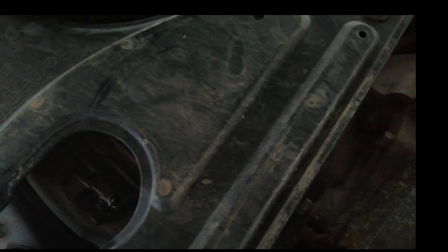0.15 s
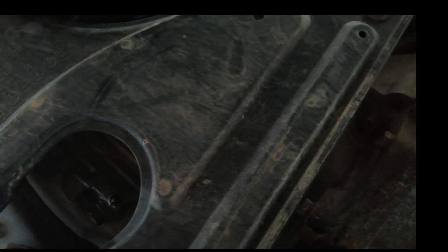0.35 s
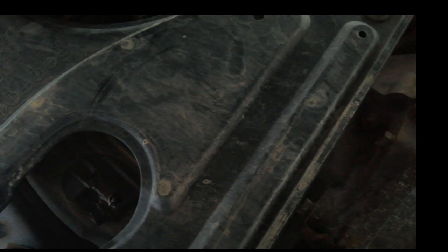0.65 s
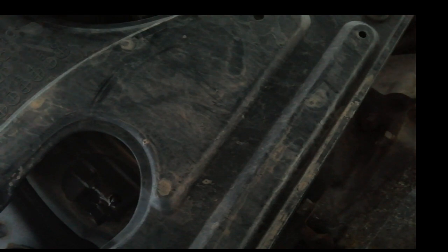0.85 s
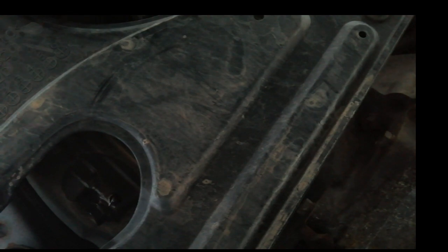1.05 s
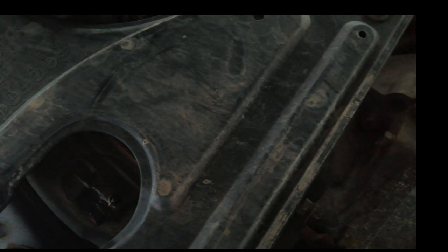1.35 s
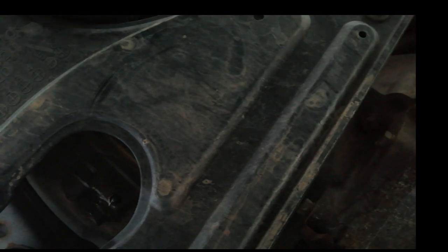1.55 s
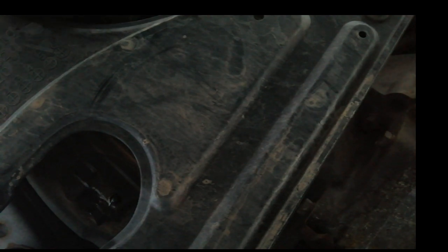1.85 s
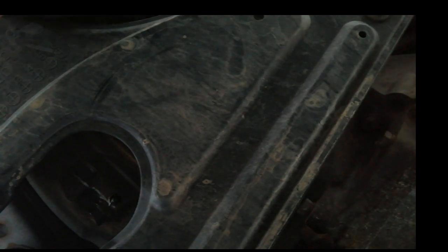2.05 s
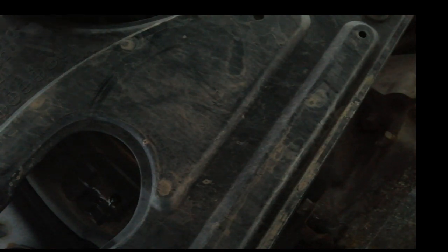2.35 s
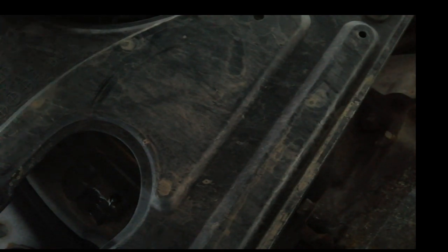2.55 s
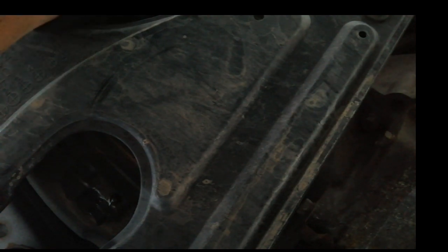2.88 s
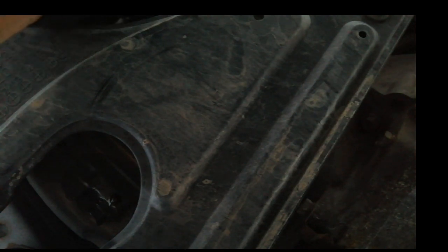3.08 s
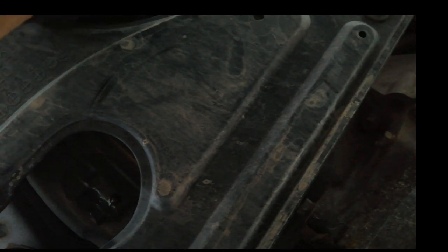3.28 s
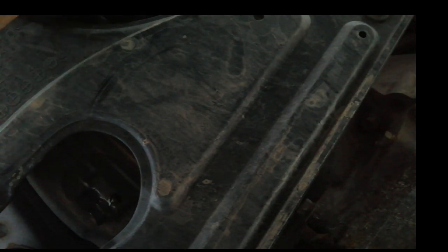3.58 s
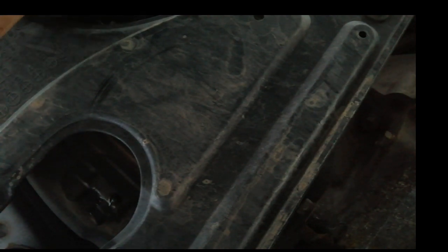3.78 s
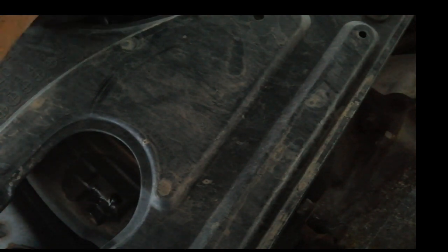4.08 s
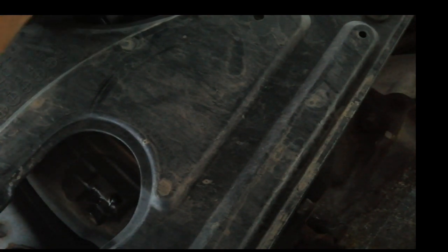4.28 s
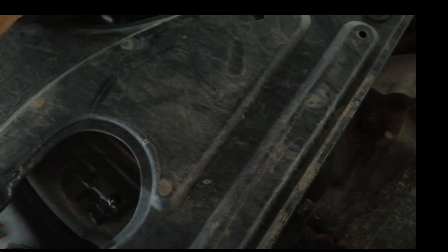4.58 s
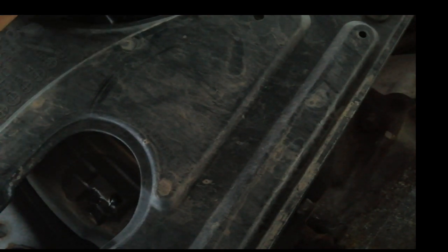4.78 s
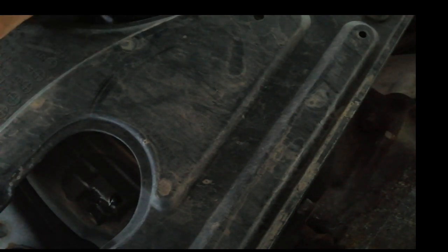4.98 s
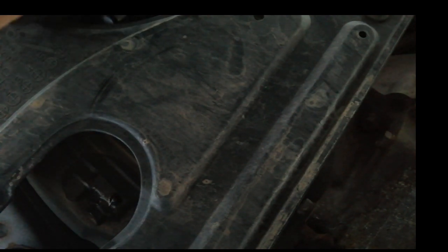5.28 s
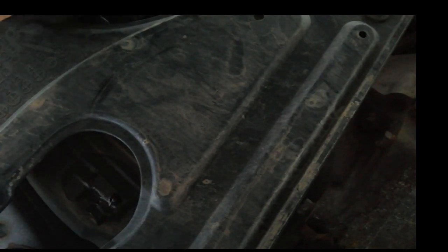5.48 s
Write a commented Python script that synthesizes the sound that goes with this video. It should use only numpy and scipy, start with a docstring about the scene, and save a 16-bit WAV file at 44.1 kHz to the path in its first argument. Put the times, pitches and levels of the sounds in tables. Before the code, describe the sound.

Oil drips unevenly into a catch pan under a vehicle, splatting and knocking over a faint high hiss.

```python
"""Engine oil drips unevenly into a catch pan under a vehicle. A high hiss, faint outdoor noise and a low
drone run from the start. Ragged splats hit the pan, joined by scuffs, hollow bumps, soft thumps and faint
high ticks. At 1.5 s one drop smacks the bare wall, and the hiss narrows and gains a thin whine. From 2 s
whole drops knock the pan and the underbody throws the knocks back; a limiter ducks briefly under the
loudest. From about 4 s a light, crinkly rustle ticks among the drips."""
import sys
import numpy as np
from scipy import signal
from scipy.fft import rfft, irfft, next_fast_len
from scipy.io import wavfile
from scipy.ndimage import uniform_filter1d, minimum_filter1d, map_coordinates

SR = 44100
rng = np.random.default_rng(int(sys.argv[2]) if len(sys.argv) > 2 else 0)


def wrap_up_sound(samples):
    """Save the sound to the file named by the first command line argument, as 16-bit audio."""
    columns = np.atleast_2d(samples).T
    # keep every value between -1 and 1, then stretch to whole-number steps
    tamed = np.clip(columns, -1, 1)
    steps = np.round(tamed * 32767).astype(np.int16)
    wavfile.write(sys.argv[1], SR, steps)


N = 248283
TIME = np.arange(N) / SR
AGE = np.arange(SR // 2) / SR  # seconds since a hit

# Stereo width of the noise beds. Each row: frequency in Hz, left-right correlation.
LIKENESS = [(60, 0.92), (130, 0.98), (290, 0.74), (640, 0), (1400, 0.37), (3000, 0.012)]
# EQ of the opening hiss. Each row: frequency in Hz, gain in dB.
BROAD_HISS_EQ = [(1470, -54), (2500, -48), (3220, -22), (3880, -22), (4630, -10.5), (5010, -8), (5370, -10),
                 (6020, -7), (6760, 0), (7360, -1.5), (9070, -0.5), (12300, -16.5), (13900, -17),
                 (15100, -28), (15800, -17.5)]
# EQ of the narrowed hiss. Each row: frequency in Hz, gain in dB.
NARROW_HISS_EQ = [(1470, -51.5), (2500, -21), (3300, -22), (4000, -15), (4710, -5), (5450, -6), (6920, -3),
                  (7590, 4.5), (7950, 3), (9280, 2), (10200, -9), (11500, -8.5), (13900, -17),
                  (15100, -21.5), (15800, -24.5)]
# EQ of the outdoor bed. Each row: frequency in Hz, gain in dB.
OUTDOOR_EQ = [(76, -26.5), (130, -3), (321, -9.5), (573, -13.5), (771, -11), (948, -11), (1050, -11.5),
              (1550, -11), (1740, -13), (4500, -14.5), (5850, -45), (9900, -120)]
# Fader ride of the outdoor bed. Each row: time in seconds, relative level in dB.
OUTDOOR_RIDE = [(0.0, -61.5), (0.44, -62), (1.35, -65.5), (2.32, -60.5), (2.56, -61.5), (3.12, -62.5),
                (3.23, -58.5), (4.47, -55.5), (5.24, -62.5), (5.63, -62.5)]
# Fader ride of the drone. Each row: time in seconds, relative level in dB.
DRONE_RIDE = [(0.0, -51), (0.53, -57.5), (0.92, -43.5), (1.29, -58), (1.74, -44.5), (1.93, -52.5),
              (5.3, -52.5), (5.63, -54)]
# EQ of the rumble. Each row: frequency in Hz, gain in dB.
RUMBLE_EQ = [(20, -19), (40, -14.5), (65, 0.5), (85, -5), (100, -5.5), (125, -18.5), (180, -27.5),
             (300, -41.5)]
# Modes of the oil-damped pan, the faint lingering ones last.
# Each row: frequency in Hz, relative level in dB, t60 in seconds, left minus right in dB.
PAN_MODES = [(382, -32, .09, 0), (710, -25, .06, 2), (825, -14, .07, -2), (955, -10, .06, -5),
             (992, -3.5, .08, -6), (1045, -9, .08, -1), (1138, -2, .11, 2), (1240, -10, .09, -1),
             (1305, -10, .1, -2), (1389, -11, .12, 0), (1505, -11, .08, 7), (1615, -11, .07, 5),
             (1847, -21, .1, 0), (2126, -28, .1, -2), (2528, -11, .07, -4), (2660, -16, .06, -2),
             (2750, -15, .075, -2), (2975, -19, .08, -3), (3172, -16, .08, -5), (3600, -29, .07, -4),
             (4850, -26, .06, -5), (5350, -31, .04, -5), (805, -36, .4, 0), (880, -34, .6, 0),
             (985, -27, .3, 0), (1168, -33, .5, 0), (1384, -36, .45, 0), (1513, -39, .9, 0)]
# EQ of the echoes under the vehicle. Each row: frequency in Hz, gain in dB.
ECHO_EQ = [(100, -42), (250, -27), (350, -24.5), (520, -22), (720, -11.5), (1050, -2.5), (1500, -4),
           (2050, -17), (2700, -11), (3900, -21), (5200, -21.5), (6800, -30.5), (15000, -49.5)]
# Decay of those echoes. Each row: frequency in Hz, t60 in seconds.
ECHO_DECAY = [(200, 0.42), (1100, 0.17), (3000, 0.16), (6000, 0.26), (12000, .06)]
# Ragged splats and a few faint rustling ticks (at 4.049, 4.085, 4.964 and 5.227 s). Each row: start in
# seconds, relative level in dB, tilt from dull to bright in dB, spread of the after-hits in seconds.
SPLATS_AND_TICKS = [(0.19, -33, -13, .02), (.689, -28, -2.5, .002), (1.663, -14.5, -0.5, .02),
                    (2.411, -18.5, 12, .005), (2.767, -17.5, 2.5, .0085), (3.243, -19.5, -1, .0063),
                    (3.368, -21, -12, .0063), (3.701, -18.5, -3, .016), (3.838, -18.5, -0.5, .0067),
                    (4.049, -39.5, 15.5, .0034), (4.085, -32.5, 18.5, .004), (4.161, -28, -6, .015),
                    (4.581, -20.5, 0.5, .021), (4.964, -38.5, -1, .024), (5.227, -28.5, -6, .024)]
# EQ of their dry slap. Each row: frequency in Hz, gain in dB.
SLAP_EQ = [(150, -30.5), (350, -8.5), (620, 1), (1200, 3), (2200, -8), (3300, -11.5), (6000, -30)]
# Dull scuffs. Each row: start in seconds, level in dB, rise in seconds.
SCUFFS = [(0.246, -46, 0.014), (0.282, -43, 0.027), (0.457, -39, 0.0015), (.494, -42.5, 0.0025),
          (0.859, -52, 0.021), (1.09, -60.5, 0.041), (2.43, -47.5, 0.018)]
# EQ of the scuffs. Each row: frequency in Hz, gain in dB.
SCUFF_EQ = [(71, -38), (120, -11), (198, 3.5), (316, -13.5), (571, -6), (658, -14.5), (1000, -4.5),
            (1120, -18.5), (1550, -14), (2150, -25.5), (2940, -18.5), (3440, -29), (5000, -29), (6500, -57),
            (11000, -120)]
# Hollow bumps. Each row: start in seconds, level in dB, pitch in Hz.
BUMPS = [(.458, -42, 184.6), (0.904, -47.5, 214), (3.698, -53, 269), (5.227, -51.5, 264)]
# Soft low thumps. Each row: crest in seconds, level in dB.
THUMPS = [(0.731, -27), (1.597, -32.5), (2.214, -29), (2.568, -30), (2.98, -33.5), (3.127, -37),
          (3.454, -33.5), (3.595, -31.5), (3.974, -30.5), (4.131, -35), (4.497, -32.5), (4.623, -35),
          (4.969, -34.5), (5.131, -34.5), (5.605, -35.5)]
# Faint high ticks and a light, crinkly rustle. Each row: start in seconds, level in dB, t60 in seconds.
RUSTLE = [(.789, -50, 0.051), (1.184, -47.5, .042), (3.36, -48.5, 0.11), (3.69, -55, .3),
          (4.062, -49.5, .15), (4.304, -46.5, 0.38), (4.394, -41.5, 0.25), (4.464, -42, 0.065),
          (4.571, -36.5, 0.17), (4.662, -53.5, 0.32), (4.793, -47.5, .16), (4.945, -48.5, 0.23),
          (5.229, -43, 0.15)]
# EQ of the crinkle. Each row: frequency in Hz, gain in dB.
CRINKLE_EQ = [(2000, -26), (3500, -9.5), (7000, -18), (9300, -7), (10600, 1.5), (12000, -11.5),
              (15500, -19)]
# EQ of the smack's crack. Each row: frequency in Hz, gain in dB.
CRACK_EQ = [(120, -56), (200, -30), (390, -11), (640, -30.5), (953, 1), (1120, -7), (1890, 1.5),
            (2480, -13), (3100, -7.5), (3410, -14.5), (5320, -36.5), (7090, -23), (9000, -42), (11700, -40),
            (19800, -120)]
# Thin tones in the hiss. Each row: frequency in Hz, relative level in dB.
WHINE_TONES = [(7779, -68.5), (8075, -72), (8732, -69)]
# Whole drops. Each row: start in seconds, relative level in dB, treble edge in dB.
DROPS = [(2.037, -34.5, -13), (2.108, 4.5, -9), (3.076, 3, -4.5), (3.517, -7.5, -6), (4.399, 9.5, 5),
         (4.914, -12.5, -11.5), (5.443, 2, 2.5)]

HISS_NARROWS_S, SMACK_S = 1.56, 1.543
DROP_SPREAD_S = .002  # droplets follow a whole drop this closely


def amp(db):
    """Decibels to gain."""
    return 10 ** (np.asarray(db) / 20)


def unit(x):
    """Scaled to rms 1."""
    return x / np.sqrt(np.mean(x ** 2) + 1e-20)


def along(points, hz):
    """(Hz, value) points read on a log axis."""
    freqs, values = np.transpose(points)
    return np.interp(np.log(hz + 1), np.log(freqs + 1), values)


def ride(points):
    """A fader move through (seconds, dB) points, as gain."""
    return amp(np.interp(TIME, *np.transpose(points)))


def sides(balance_db):
    """Left and right gains; positive leans left."""
    return amp(np.array([[balance_db], [-balance_db]]) / 2)


def add(track, start, sound):
    """Mix a sound in at start seconds."""
    part = track[:, round(start * SR):][:, :sound.shape[1]]
    part += sound[:, :part.shape[1]]


def fade(t, t60):
    """A decay of 60 dB in t60 seconds."""
    return amp(-60 * t / t60)


def wobble(rate):
    """A smooth random curve with rate knots a second."""
    return map_coordinates(rng.standard_normal(int(N * rate / SR) + 4), [TIME * rate / SR])


def grain(depth_db, rate):
    """A random gain that changes rate times a second."""
    return amp(depth_db * wobble(rate))


def noise(eq):
    """Coloured stereo noise of rms 1, centred in the bass and wide in the treble."""
    size = next_fast_len(N)
    hz = np.fft.rfftfreq(size, 1 / SR)
    width = np.arccos(np.clip(along(LIKENESS, hz), -1, 1)) / 2
    spectrum = rfft(rng.standard_normal((2, size))) * amp(along(eq, hz))
    mid, side = irfft(spectrum * [np.cos(width), np.sin(width)], size)[:, :N]
    return unit(np.array([mid + side, mid - side]))


def coloured(x, eq, size=32768):
    """A short sound through a minimum-phase EQ, which keeps its attack clean."""
    cepstrum = irfft(np.log(amp(along(eq, np.fft.rfftfreq(size, 1 / SR)))))
    cepstrum[1:size // 2] *= 2
    cepstrum[size // 2 + 1:] = 0
    return irfft(rfft(x, size) * np.exp(rfft(cepstrum)))[:, :x.shape[1]]


def bursts(rows):
    """One envelope from (start, peak dB, rise, t60) bursts, with times in seconds."""
    envelope = np.zeros((1, N))
    for start, db, rise, t60 in rows:
        shape = (1 - np.exp(-AGE / rise)) * fade(AGE, t60)
        add(envelope, start, amp(db) * shape[None] / shape.max())
    return envelope


def narrowing():
    """A 50 ms ramp from 0 to 1 where the hiss narrows."""
    return np.clip((TIME - HISS_NARROWS_S) / .05, 0, 1)


def hiss():
    """A high hiss crossfades from broad to narrow at a steady level."""
    turn = narrowing() * np.pi / 2
    blend = np.cos(turn) * noise(BROAD_HISS_EQ) + np.sin(turn) * noise(NARROW_HISS_EQ)
    return amp(-48.5) * sides(-1.5) * blend


def outdoors():
    """A faint, fluttering bed of outdoor noise."""
    return amp(-0.25) * ride(OUTDOOR_RIDE) * grain(depth_db=2.2, rate=11) * noise(OUTDOOR_EQ)


def drone(centre_hz=61.5, wander_hz=6):
    """A low tone wanders in pitch and level."""
    hz = centre_hz + wander_hz * wobble(rate=7)
    tone = np.sin(2 * np.pi * np.cumsum(hz) / SR)
    return amp(-0.7) * ride(DRONE_RIDE) * unit(grain(depth_db=3, rate=6) * tone)


def rumble():
    """Bass noise surges gently under the drone."""
    return amp(-53.5) * grain(depth_db=2, rate=7) * noise(RUMBLE_EQ)


def pan_ring(attack_s=0.0008, right_lag_s=0.00013, scatter_db=6.5, detune=0.0013, radiate_hz=647):
    """One blow starts all the pan's modes together, each with its own place left to right."""
    t = np.array([AGE, np.maximum(AGE - right_lag_s, 0)])
    chance = rng.standard_normal((len(PAN_MODES), 2))
    ring = 0
    for (hz, db, t60, lean_db), (louder, sharper) in zip(PAN_MODES, chance):
        tone = np.sin(2 * np.pi * hz * t * (1 + detune * sharper))
        ring += sides(lean_db) * amp(db + scatter_db * louder) * fade(t, t60) * tone
    small_panel = signal.butter(2, radiate_hz, "highpass", fs=SR, output="sos")  # radiates little bass
    return unit(signal.sosfilt(small_panel, ring * (1 - np.exp(-t / attack_s))))


def underbody(eq, build_s):
    """Dense reflections between ground and chassis; the bass hangs on longest."""
    hz, _, bands = signal.stft(rng.standard_normal((2, len(AGE))), SR, nperseg=256)
    t = np.linspace(0, AGE[-1], bands.shape[-1])
    decay = fade(t, along(ECHO_DECAY, hz)[:, None])
    tail = signal.istft(bands * decay, SR, nperseg=256)[1][:, :len(AGE)]
    return unit(coloured(tail * (1 - np.exp(-AGE / build_s)), eq))


def punch(boost_db=7.5, life_s=0.0086):
    """The first cycles of a knock arrive straight from the pan and stand above its ringing."""
    return 1 + amp(boost_db) * np.exp(-AGE / life_s)


def pan_hit(spread_s, thud_db, clang_db, edge_db, sizzle_db, ring_db, after_hits=5):
    """One knock on the pan, with a few lighter hits following within spread_s."""
    breakup = min(spread_s * 35, .7)  # a ragged hit rings less cleanly and has heavier after-hits
    ring = amp(ring_db) * pan_ring()
    echo = (amp(-7) + breakup) * sides(0.5) * underbody(ECHO_EQ, build_s=0.0015)
    knock = punch() * (ring + echo)
    hit = knock.copy()
    for late in rng.random(after_hits):
        add(hit, late * spread_s, breakup * (1 - late / 2) * rng.choice([-1, 1]) * knock)
    scoop_db = (clang_db + edge_db) / 2 - 4.5  # the pan answers weakly between clang and edge
    eq = [(330, thud_db), (510, thud_db / 3 - 8), (700, -2.5), (1080, 0), (1550, clang_db),
          (2160, scoop_db), (2800, edge_db), (5500, sizzle_db), (9000, min(sizzle_db, 0))]
    return amp(-32) * coloured(unit(hit), eq)


def splats_and_ticks(typical_db=-17):
    """Ragged splats and a few faint rustling ticks: dry slaps with little ring, sharper when quieter."""
    out = np.zeros((2, N))
    for start, db, tilt_db, spread_s in SPLATS_AND_TICKS:
        thud_db, clang_db = 9.5 - tilt_db, 3 + 0.9 * tilt_db
        edge_db = -7 + .3 * tilt_db + 0.99 * (typical_db - db)
        knock = pan_hit(spread_s, thud_db, clang_db, edge_db, sizzle_db=edge_db, ring_db=-5.5)
        slap = coloured(rng.standard_normal((2, len(AGE))) * fade(AGE, t60=0.11), SLAP_EQ)
        add(out, start, amp(db) * (amp(-0.5) * knock + amp(-10) * slap))
    return out * sides(-2.4)


def scuffs(abrupt_t60=0.16, linger=4.8):
    """Brief gritty rubbing close by; slower strokes linger longer."""
    envelope = bursts([(start, db, rise, abrupt_t60 + linger * rise) for start, db, rise in SCUFFS])
    return envelope * unit(noise(SCUFF_EQ) * grain(depth_db=3, rate=250))


def bumps(rise_s=.004, t60=0.21):
    """Soft hollow knocks that hum for a moment."""
    return sum(bursts([(start, db, rise_s, t60)]) * np.sin(2 * np.pi * hz * (TIME - start))
               for start, db, hz in BUMPS)


def thumps(width_s=0.024, typical_hz=53.5, typical_db=-31.5):
    """Soft bass pulses of a few cycles; stronger ones sit a little higher."""
    out = np.zeros(N)
    for crest, db in THUMPS:
        hz = typical_hz + (db - typical_db)  # 1 Hz for each dB
        t = TIME - crest
        out += amp(db) * np.exp(-(t / width_s) ** 2) * np.sin(2 * np.pi * hz * t)
    return out


def rustle(drop_db=-54, drop_t60=.07, rise_share=.035):
    """Faint high ticks and a light, crinkly rustle; the same crinkle tops the smack and whole drops."""
    on_drops = [(start, db + drop_db, drop_t60) for start, db, _ in DROPS]
    on_smack = (SMACK_S, -17, .0007, .053)
    rows = [(start, db, rise_share * t60, t60) for start, db, t60 in RUSTLE + on_drops]
    crinkle = unit(noise(CRINKLE_EQ) * grain(depth_db=10, rate=1100))
    return bursts(rows + [on_smack]) * crinkle * sides(6)


def smack(wall_hz=1513):
    """One drop cracks on the bare wall, knocks the pan and leaves a single tone ringing."""
    out = np.zeros((2, N))
    crack = unit(punch(boost_db=16, life_s=0.014) * underbody(CRACK_EQ, build_s=0.00052))
    knock = pan_hit(DROP_SPREAD_S, thud_db=8, clang_db=5.5, edge_db=-2, sizzle_db=5, ring_db=-4)
    wall = fade(AGE, t60=0.91) * np.sin(2 * np.pi * wall_hz * AGE)
    add(out, SMACK_S, amp(-24) * crack + amp(-8.5) * knock + amp(-43.5) * wall)
    return out


def whine():
    """Thin wavering tones sit in the hiss once it has narrowed."""
    tones = 0
    for hz, db in WHINE_TONES:
        phase_drift = rng.random((2, 1)) + grain(depth_db=1.5, rate=10)
        tones += amp(db - 1) * grain(depth_db=3, rate=8) * np.sin(2 * np.pi * (hz * TIME + phase_drift))
    return tones * narrowing()


def drops():
    """Whole drops ring the pan cleanly; sharper landings clang more."""
    out = np.zeros((2, N))
    for start, db, edge_db in DROPS:
        knock = pan_hit(DROP_SPREAD_S, thud_db=-1, clang_db=0.5 * edge_db - 0.5, edge_db=edge_db,
                        sizzle_db=edge_db - 6.5, ring_db=1)  # the oil damps the highest modes
        add(out, start, amp(db) * knock)
    return out * sides(-2.24)


def scene():
    """The stereo mix: dripping oil up front, small noises and steady beds behind."""
    hits = drops() + splats_and_ticks() + smack()
    small_noises = rustle() + scuffs() + bumps() + thumps()
    return hits + small_noises + drone() + rumble() + hiss() + outdoors() + whine()


def record(dry, ceiling_db=-1.5, release_db_per_s=28, smooth_samples=90, top_hz=15850):
    """A limiter ducks under the loudest drops, then a steep low-pass trims the top."""
    over_db = np.maximum(20 * np.log10(np.abs(dry).max(0) + 1e-9) - ceiling_db, 0)
    recovery_db = release_db_per_s * TIME
    duck_db = np.maximum.accumulate(over_db + recovery_db) - recovery_db
    gain = uniform_filter1d(minimum_filter1d(amp(-duck_db), smooth_samples), smooth_samples)
    size = next_fast_len(N + SR // 2)
    passband = np.fft.rfftfreq(size, 1 / SR) < top_hz
    return irfft(rfft(dry * gain, size) * passband, size)[:, :N]


dry = scene()
out = record(dry)
wrap_up_sound(out)
```